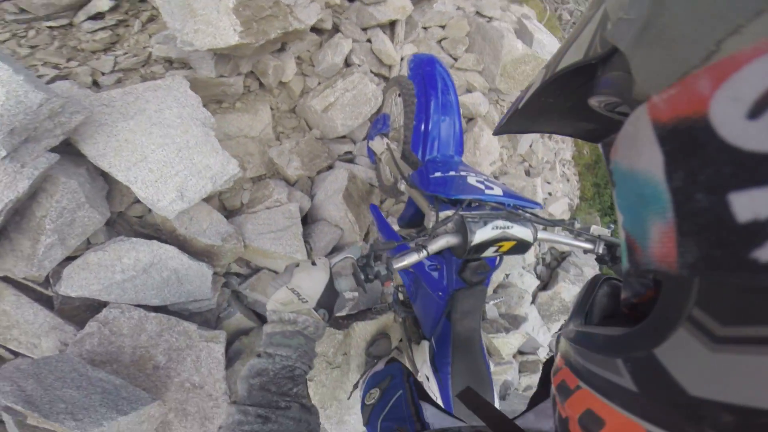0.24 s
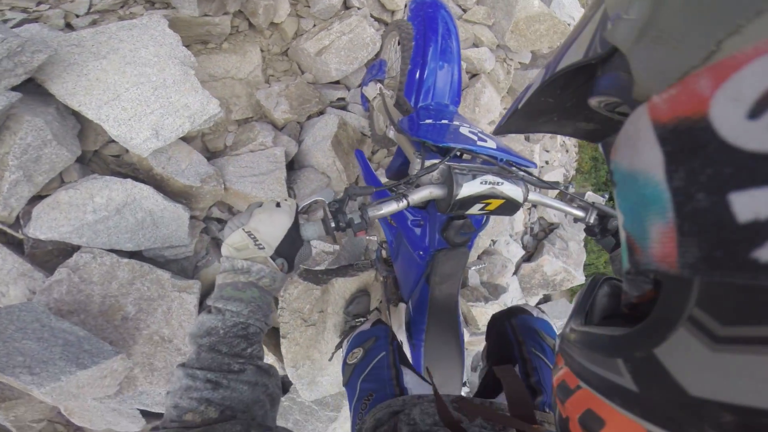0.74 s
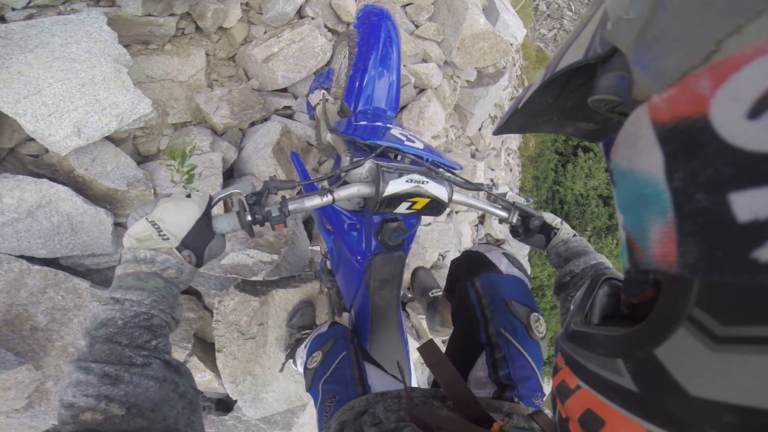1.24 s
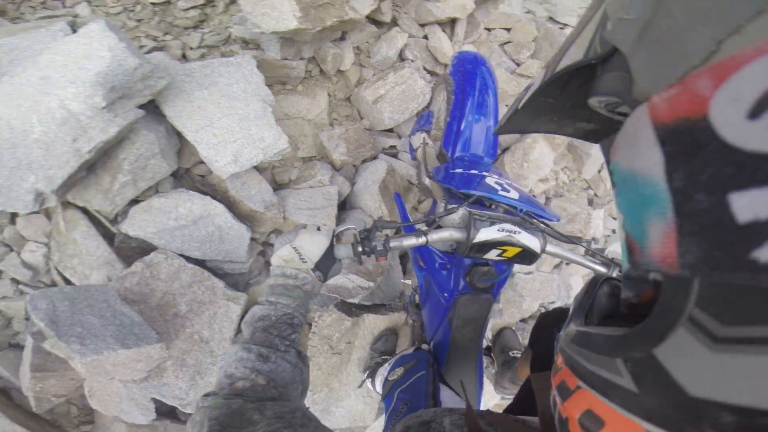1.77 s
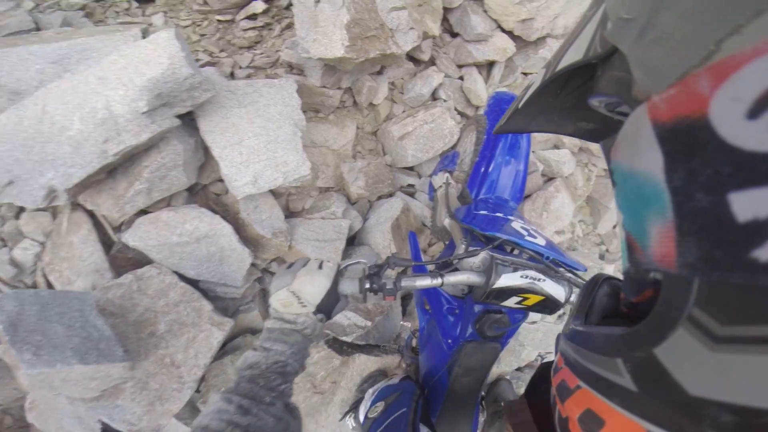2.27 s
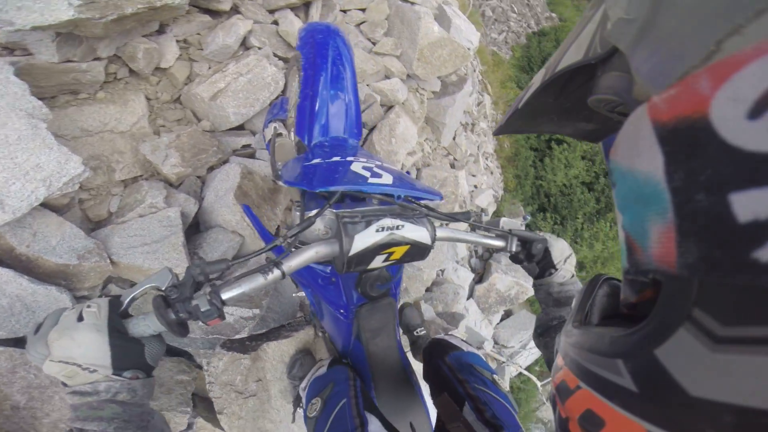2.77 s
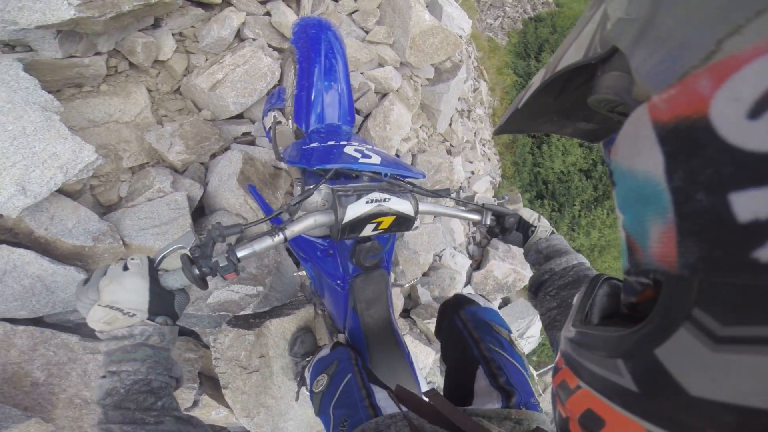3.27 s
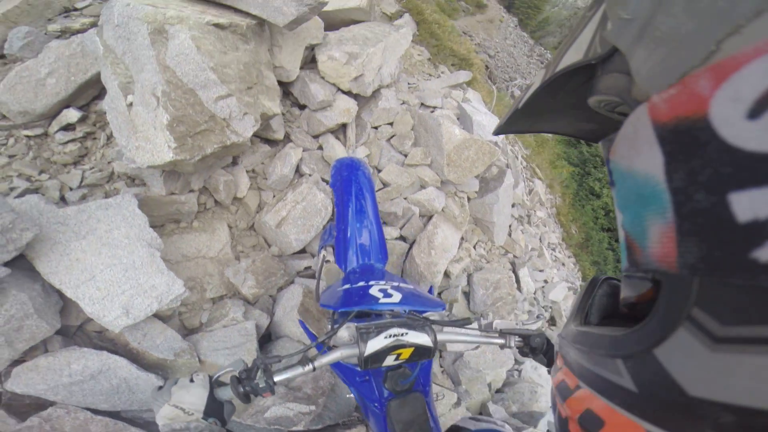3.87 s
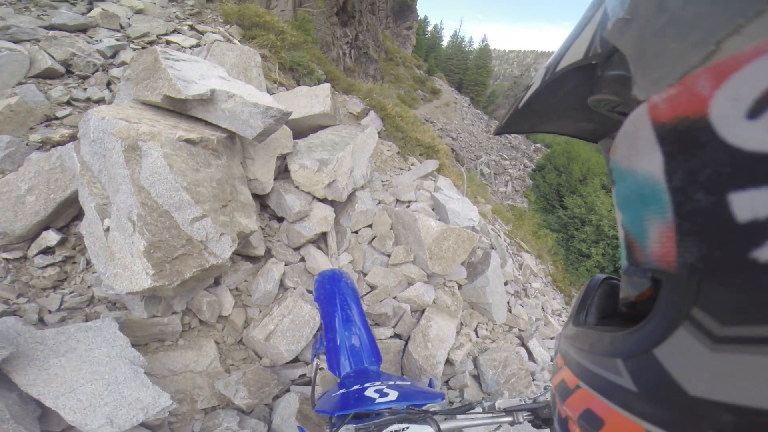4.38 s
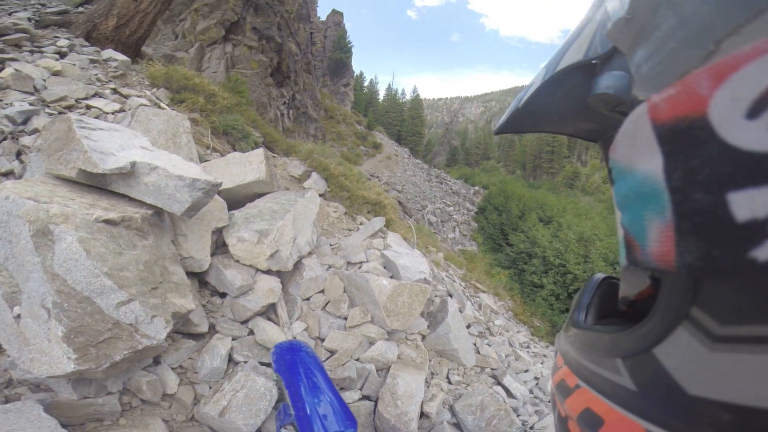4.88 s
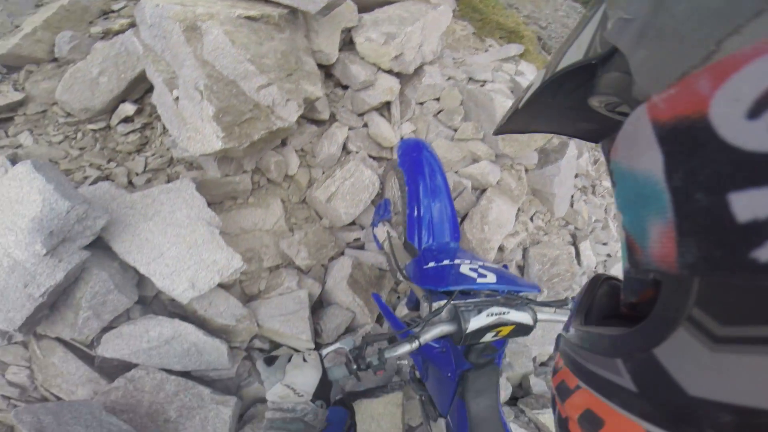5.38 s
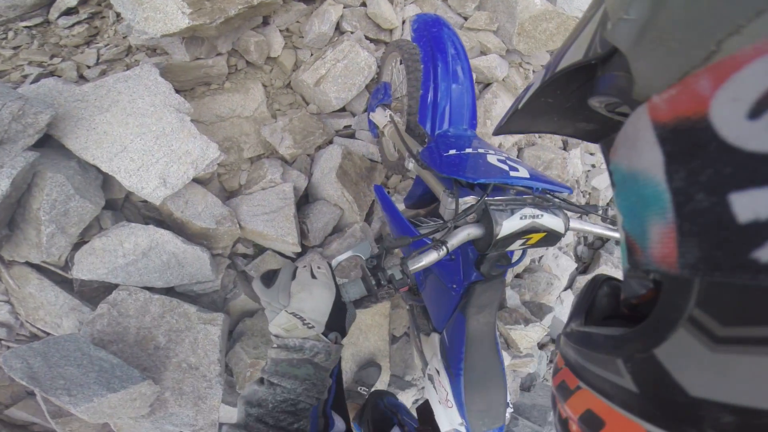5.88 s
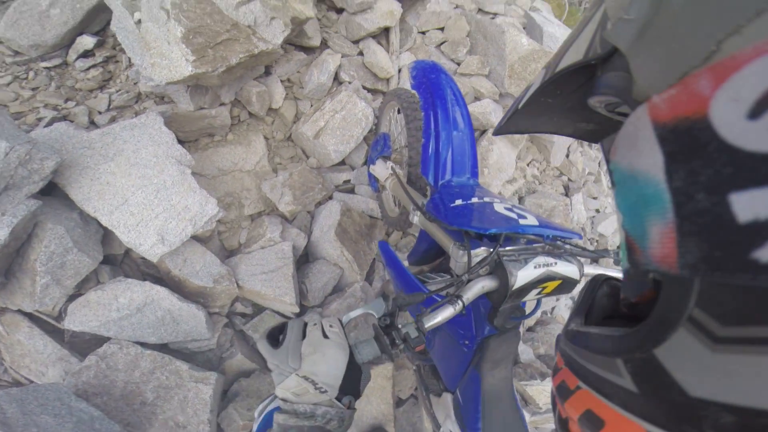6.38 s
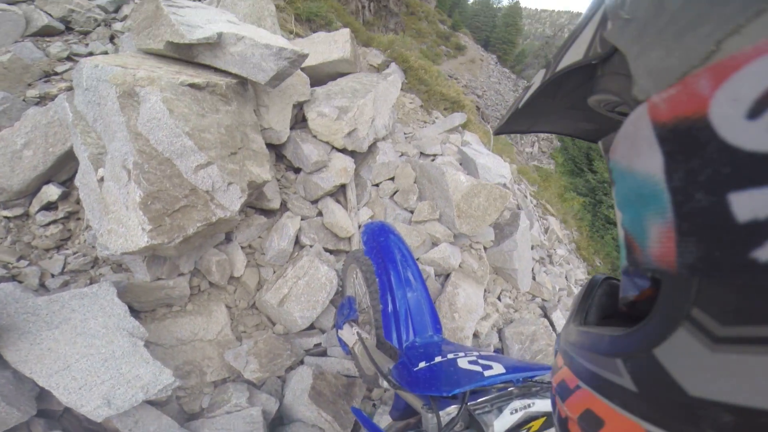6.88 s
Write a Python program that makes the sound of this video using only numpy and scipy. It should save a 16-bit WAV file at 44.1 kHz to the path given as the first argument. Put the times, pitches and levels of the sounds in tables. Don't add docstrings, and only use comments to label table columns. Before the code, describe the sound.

Close, gritty boot scrapes and stone knocks open the scene under low wind buffeting. After a quiet wait, a kick lever swishes and slams, and a two-stroke engine bursts into a loud, rising rev. It coasts down with whirring and rattling, revs again more briefly, falls back and idles with irregular soft pops. The single close microphone sounds boxy and muffled, with a short echo from surrounding boulders.

```python
import sys
import numpy as np
from scipy import signal
from scipy.fft import rfft, irfft
from scipy.io import wavfile
from scipy.ndimage import uniform_filter1d

SR = 44100
rng = np.random.default_rng(int(sys.argv[2]) if len(sys.argv) > 2 else 0)


def unload_wav(signal):
    wavfile.write(
        sys.argv[1],
        SR,
        np.round(np.clip(np.atleast_2d(signal).T, -1, 1) * 32767).astype(np.int16),
    )


def to_linear_factor(level_db):
    exponent = np.asarray(level_db, float) / 20
    return 10 ** exponent


N = 314433
T = np.arange(N) / SR
HZ = np.fft.rfftfreq(8192, 1 / SR) + 1
PUFF = SR // 4
IDLE_FROM_S = 5.15

# time in seconds, turns in Hz, steady burn in dB,
# level gained as the head nears the engine in dB, head raised from 0 to 1.
CRANK = [(2.6, 29.8, -36, 1, 0.1), (2.648, 39.2, -23, 0.5, 0.4), (2.699, 42.1, -24, 3, 0.2),
         (2.751, 62.7, -21, -2.5, 0.4), (2.811, 82.2, -17.5, -7.5, 1), (2.89, 109.4, -18.5, 2.5, 0),
         (2.93, 122.5, -23, 1, 0.37), (3.31, 90.83, -40, -0.5, 0.4), (3.819, 65.88, -35, 0.5, 0.58),
         (3.948, 67.3, -39, 0, 0.7), (4.1, 81.1, -28, -0.5, 0.41), (4.218, 94.04, -40, 0.5, 0.4),
         (4.831, 65.3, -51, -0.5, 0.99), (5.211, 54.7, -53, -0.5, 0.56), (5.7, 46.9, -52, 1, 0.18),
         (6.11, 52, -42, 0, 0.16), (6.45, 53.7, -38.5, 1.5, .6), (7.13, 54.3, -41, 2, 0.75)]


def level(x, db=0):
    return x * to_linear_factor(db) / np.sqrt(np.mean(x ** 2))


def peak(x):
    return x / np.abs(x).max()


def shape(points):
    hz, db = np.transpose(points)
    return to_linear_factor(np.interp(np.log(HZ), np.log(hz), db))


def modes(table, steep=2):
    return np.sqrt(sum(to_linear_factor(db) ** 2 / (1 + (2 * (HZ - hz) / width) ** 2) ** steep for hz, width, db in table))


def through(x, gain):
    cep = irfft(np.log(gain + 1e-7))
    cep[1:4096] *= 2
    cep[4097:] = 0
    return signal.fftconvolve(x, irfft(np.exp(rfft(cep))))[:N]


def clicks(times, sizes):
    place = np.clip(times * SR, 0, N - 2)
    whole = place.astype(int)
    part = place - whole
    return np.bincount(whole, sizes * (1 - part), N) + np.bincount(whole + 1, sizes * part, N)


def burst(rise_s, hold_s, t60_s):
    t = T[:PUFF]
    return np.minimum(t / rise_s, 1) * np.exp(-np.log(1000) * np.maximum(t - hold_s, 0) / t60_s)


def walk(rate):
    k = int(SR / rate)
    steps = np.repeat(rng.standard_normal(N // k + 1), k)
    return 0.69 * uniform_filter1d(uniform_filter1d(steps, k), k)[:N]


def noise():
    return rng.standard_normal(N)


def engine():
    # frequency in Hz, level in dB per Hz.
    gas_colour = [(590, -21.5), (1000, -19), (1260, -52), (1490, -25), (1900, -1), (2490, -1), (2830, -1),
                  (3390, 0.5), (3640, -1), (4520, 4), (12500, -27.5), (15300, -32)]
    # frequency in Hz, width in Hz, level in dB.
    jet_edge = [(7760, 6600, 2), (8700, 480, 6), (10500, 700, 0.5)]
    # frequency in Hz, width in Hz, depth from 0 to 1.
    dips = [(1295, 154, 0.88), (1860, 81, 0.14), (3606, 220, 0.54)]
    hz, burn_db, clatter_db, low_db, hiss_db = controls()
    running = np.clip((T - CRANK[0][0]) / 0.0055 + 1, 0, 1)
    angle = crank_angle(hz)
    gas = (1 + 0.16 * np.cos(2 * np.pi * angle)) * noise()
    hiss = level(through(gas, shape(gas_colour)), -6.5) * to_linear_factor(hiss_db)
    spit = noise() * (.35 + np.exp(-(angle % 1) / .2))
    jet = level(through(spit, modes(jet_edge)), -20.5) * throttle() * to_linear_factor(burn_db) * (hz / 80) ** 2.2
    helmet = np.ones(len(HZ))
    for dip_hz, width, depth in dips:
        helmet = helmet * (1 - np.clip(depth, 0, .9) / (1 + (2 * (HZ - dip_hz) / width) ** 2))
    mechanics = case(hz, angle, clatter_db, low_db) + gears(hz)
    return through(running * (exhaust(hz, angle, burn_db) + mechanics + hiss + jet), helmet)


def controls():
    s, hz, *columns = np.transpose(CRANK)
    hz = np.exp(np.interp(T, s, np.log(hz)))
    burn_db, head_db, raised = (np.interp(T, s, c) for c in columns)

    def law(db_at_80_hz, db_per_doubling, slowest_hz=25):
        return db_at_80_hz + db_per_doubling * np.log2(np.maximum(hz, slowest_hz) / 80)

    def both(free_db, load_db):
        return head_db + 20 * np.log10(np.hypot(to_linear_factor(free_db), throttle() * to_linear_factor(burn_db + load_db)))

    clatter_db = both(law(-33, 7.9, slowest_hz=46), law(-10, 6.7))
    hiss_db = both(law(-32, 18), law(-0.26, 6.9))
    low_db = law(-6, -2, slowest_hz=54.7) + 7 * raised
    return hz, burn_db, clatter_db, low_db, hiss_db


def throttle():
    # start in seconds, end in seconds.
    coasting = [
        (2.922, 3.84),
        (4.215, 5.15),
    ]
    shut_s = .012
    return 1 - sum(np.clip(np.minimum(T - a, b - T) / shut_s, 0, 1) for a, b in coasting)


def firings():
    # time in seconds, thump peak in dB.
    rev_firings = [(2.6, -9.5), (2.635, -16), (2.731, -11), (2.795, -9), (2.807, -22), (2.84, -6),
                   (2.861, -6), (3.866, -14), (3.94, -11), (3.999, -12), (4.04, -12), (4.082, -12),
                   (4.094, -39), (4.107, -14), (4.12, -18), (4.143, -15), (4.154, -16), (4.187, -12),
                   (4.198, -19)]
    # time in seconds, thump peak in dB.
    idle_firings = [(4.889, -22), (4.986, -20), (5.25, -27), (5.344, -27), (5.382, -28), (5.461, -25.5),
                    (5.498, -23), (5.599, -20), (5.7, -23), (5.741, -25), (5.824, -25), (5.864, -24.5),
                    (5.928, -26), (5.947, -22.5), (5.988, -27.5), (6.008, -26.5), (6.028, -24.5),
                    (6.07, -20), (6.145, -19), (6.221, -18), (6.313, -18), (6.384, -22.5), (6.456, -20.5),
                    (6.527, -19.5), (6.597, -18.5), (6.667, -18.5), (6.743, -19), (6.796, -22.5),
                    (6.868, -20), (6.936, -18), (7.006, -19.5), (7.075, -20)]
    s, db = np.transpose(rev_firings)
    idle_s, idle_db = np.transpose(idle_firings)
    crack_db = db + np.where(s < 3.3, -21.5, -15)
    idle_crack_db = -32.5 + 2.3 * (idle_db + 20)
    return np.r_[s, idle_s], np.r_[db, idle_db], np.r_[crack_db, idle_crack_db]


def crank_angle(hz):
    turns = np.cumsum(hz) / SR
    at_fire = np.interp(firings()[0], T, turns)
    whole = np.r_[0, np.cumsum(np.round(np.diff(at_fire)))]
    return turns + np.interp(turns, at_fire, whole - at_fire)


def exhaust(hz, angle, burn_db):
    # frequency in Hz, width in Hz, level in dB.
    pipe = [(244, 75, -5), (388, 51, 5.5), (486, 80, 2.5), (641, 89, 1), (756, 132, 1.5), (1080, 140, -3)]
    # multiple of the turn, level in dB.
    song = [(2, -9), (4, -3.5), (5, -15)]
    # frequency in Hz, width in Hz, level in dB.
    churn = [(260, 75, -1.5), (400, 110, 0), (695, 430, -11.5)]
    turn = np.arange(int(angle[-1]) + 1)
    pump_chance, burn_chance, time_chance = rng.standard_normal((3, len(turn)))
    at = np.interp(turn + .008 * time_chance, angle, T)
    even = 1 / np.sqrt(np.interp(at, T, hz))
    strokes = clicks(at, even * to_linear_factor(1.2 * pump_chance))
    pump = sum(through(strokes, modes([mode])) * to_linear_factor(3.0 * walk(6.07)) for mode in pipe)
    s, thump_db, crack_db = firings()
    since_s = at - np.r_[-1, s][np.searchsorted(s, at - .008)]
    spent_db = -6 * np.exp(-since_s / .03) * (at > IDLE_FROM_S)
    weak = clicks(at, even * to_linear_factor(2.5 * burn_chance + spent_db))
    burns = level(weak, -28.5) * throttle() * to_linear_factor(burn_db) + clicks(s - .002, to_linear_factor(thump_db - 5.5))
    frame = frame_hum(hz, angle)
    airflow = level(pump, -46.5) * (hz / 80) ** 2.38 + frame * to_linear_factor(-45.5) * (hz / 80) ** 0.93
    howl = sum(to_linear_factor(db) * np.sin(2 * np.pi * k * angle) for k, db in song) * (hz / 120) ** 6.2
    growl = level(through(noise(), modes(churn)), -10.5) * (T <= IDLE_FROM_S)
    loaded = (frame * to_linear_factor(-18.5) + howl + growl) * throttle() * to_linear_factor(burn_db)
    return airflow + loaded + thumps(burns) + crack(s, crack_db)


def thumps(burns):
    # frequency in Hz, width in Hz, level in dB.
    front = [(266, 85, 5.5), (384, 340, 4.5), (590, 340, 3), (720, 280, 3.5)]
    idle = T > IDLE_FROM_S
    push_s = 0.00254
    open_end = (HZ / (HZ + 120)) ** 2 / (1 + (HZ / 900) ** 4)
    pushed = signal.fftconvolve(burns, burst(push_s, push_s, 0.00083) / (push_s * SR / 2))[:N]
    hard = to_linear_factor(39.0) * through(pushed * ~idle, modes(front, steep=2.4) * open_end)
    soft = signal.fftconvolve(burns * (1 + idle * (1 - to_linear_factor(-13.0))), blow())[:N]
    return hard + soft


def blow():
    # frequency in Hz, width in Hz, level in dB.
    hot_pipe = [(200, 57, 0.5), (400.7, 51.6, 12), (509.5, 63, 4.5), (676, 203, -3.5)]
    t = T[:PUFF]
    wave = burst(0.00266, 0.0069, 0.018) * np.sin(2 * np.pi * (250 * t + 7000 * t ** 2))
    ring = through(burst(0.00024, 0.0014, 0.0015), modes(hot_pipe, steep=2.16))[:PUFF]
    return peak(through(wave, HZ ** 2 / (HZ ** 2 + 120 ** 2))[:PUFF] + to_linear_factor(-5) * peak(ring))


def crack(s, crack_db):
    # frequency in Hz, level in dB per Hz.
    crack_colour = [(1650, -13.5), (2800, -5.5), (3070, -10), (3640, -9), (4230, -0.5), (5050, -8),
                    (5990, -0.5), (8080, -14.5), (13600, -25.5), (15300, -44)]
    starts = clicks(s - .0065, to_linear_factor(crack_db - 1.0))

    def puffs(hold_s, t60_s):
        return signal.fftconvolve(starts, burst(.0018, hold_s, t60_s))[:N]

    spray = level(through(noise(), shape(crack_colour)) * to_linear_factor(1.9 * walk(370)))
    body = through(spray, 1 / (1 + (HZ / 8500) ** 6))
    top = through(spray, 1 / (1 + (8500 / HZ) ** 6))
    return body * puffs(0.018, 0.11) + top * puffs(0.017, 0.043)


def frame_hum(hz, angle):
    # multiple of the turn, level in dB.
    orders = [(1, 0), (2, -1), (3, -1), (4, 0), (5, -2), (6, -4), (7, -4), (8, -6), (9, -7), (10, -8)]
    # frequency in Hz, gain in dB.
    frame_gain = [(45, -7.5), (125, 1), (195, -11), (270, 2.5), (340, 0.5), (390, 7), (450, -4), (560, -10),
                  (740, 2), (950, -19)]
    passed_hz, passed_db = np.transpose(frame_gain)
    hum = np.zeros(N)
    for k, db in orders:
        waver_db = 2.8 * (walk(7) + walk(24.93))
        heard_db = db + np.interp(k * hz, passed_hz, passed_db) + waver_db
        hum += to_linear_factor(heard_db) * np.sin(2 * np.pi * k * angle)
    return hum


def case(hz, angle, clatter_db, low_db):
    # frequency in Hz, width in Hz,
    # level in dB, gain in dB per doubling of speed.
    covers = [(1100, 18, -12.5, -22), (1399, 63, 1, -0.5), (1490, 76, 7, -0.5), (1670, 150, 2, 4),
              (1788, 40, -1, 9), (2182, 108, 6, -3.5), (2524, 178, 6.5, 0.5), (2763, 74, 0.5, 1),
              (3096, 270, -5.5, 12.5), (4146, 310, -4, 9), (4390, 225, -14.5, -24), (5730, 570, -3.5, 4.5),
              (6660, 230, -6.5, 5), (8500, 450, -30, 8)]
    turns = int(angle[-1]) + 1
    time_chance, size_chance = rng.standard_normal((2, turns, 14))
    angles, weight = rng.random(14), rng.standard_normal(14)
    at = np.interp(np.arange(turns)[:, None] + angles + .003 * time_chance, angle, T)
    size = weight * to_linear_factor(2 * size_chance) / np.sqrt(np.interp(at, T, hz))
    steady = np.clip((hz - 40) / 40, .1, 1)
    slap = level(clicks(at.ravel(), size.ravel()), 2) * steady
    rattle = noise() * np.sqrt(2 - steady ** 2)
    shake = through(slap + rattle, 1 / (1 + (HZ / 8200) ** 5))
    doublings = np.log2(np.maximum(hz, 45) / 75)
    panels = []
    for *mode, per_doubling_db in covers:
        flutter_db = 3.5 * walk(4.09)
        panels.append(through(shake, modes([mode], steep=1.25)) * to_linear_factor(per_doubling_db * doublings + flutter_db))
    return to_linear_factor(clatter_db) * (level(sum(panels[5:])) + level(sum(panels[:5])) * to_linear_factor(low_db))


def gears(hz):
    # frequency in Hz, width in Hz, level in dB.
    cover = [(1460, 360, 2.5)]
    turns = np.cumsum(hz) / SR
    wobble = 4.0 + 2.6 * level(through(noise(), modes([(0, 111, 0)])))
    mesh = wobble * to_linear_factor(2.1 * walk(3.4)) * np.sin(2 * np.pi * 21 * turns)
    heard = through(level(mesh), modes(cover) + .45)
    return heard * to_linear_factor(-43 + 11 * np.log2(hz / 80)) * np.clip((T - 2.8) / .12, 0, 1)


def whistle():
    start_s, end_s = 4.22, 4.95
    fade = np.clip(np.minimum(T - start_s, end_s - T) / 0.055, 0, 1)
    return level(through(noise(), modes([(10300, 30, 0)])), -63) * fade


def kick():
    # frequency in Hz, width in Hz, level in dB.
    stop = [(2600, 160, 0), (4450, 260, -2), (6400, 800, -13), (1500, 300, -14), (8800, 900, -22),
            (11000, 5000, -37)]
    creak = through(clicks(np.array([1.332]), np.ones(1)), modes([(10100, 90, 0), (5050, 90, -2)]))
    ratchet = level(through(noise(), modes([(1930, 2000, 0)])), -50) * np.exp(-((T - 2.482) / 0.026) ** 2)
    swish = level(through(noise(), modes([(7360, 2900, 0), (4500, 1200, 2)])), -53)
    swish = swish * np.exp(-((T - 2.52) / .011) ** 2)
    puff = clicks(np.array([2.527, 2.537]), np.array([1, .7]))
    puff = through(puff, modes([(239, 54, 1.5), (302, 140, 9.1)]))
    slam = clicks(np.array([2.586]), np.ones(1))
    slam = signal.fftconvolve(slam, burst(0.0053, 0.0074, 0.031))[:N] * noise()
    slam = through(slam, modes(stop, steep=1.2))
    return to_linear_factor(-56) * peak(creak) + ratchet + swish + to_linear_factor(-31.0) * peak(puff) + to_linear_factor(-8.5) * peak(slam)


def knocks():
    # time in seconds, peak in dB, main ring in Hz,
    # high ring in dB, thud in dB.
    hits = [(0.07, -45, 1640, -19, -20), (0.109, -44, 1050, -11, -25), (0.143, -21, 1080, 0, -45),
            (0.16, -19, 1080, -10, -32), (0.172, -27, 1180, -25, -33), (0.187, -27.5, 1680, -23.5, -17),
            (0.22, -34, 1700, 4, -29), (0.262, -42, 1080, -3, -26), (0.316, -45, 1200, -10, -25),
            (0.35, -39, 1100, -14, -25), (0.377, -36, 1760, -16, -24), (0.396, -44, 1700, -8, -27),
            (0.418, -34.5, 1130, -26, -16), (0.486, -38, 1460, -21, -26), (0.521, -28.5, 1740, -31, -22),
            (0.55, -28.5, 1930, -20, -25), (0.563, -40, 2100, -12, -30), (0.575, -25, 1860, -31, -31),
            (0.595, -50, 2000, -20, -30), (0.837, -43, 1220, -1, -17), (0.885, -46, 1100, -8, -13),
            (0.921, -43, 1010, -7, -24), (0.94, -42, 1500, -8, -23), (0.96, -38, 1690, -5, -31),
            (1.402, -44, 2580, -9, -34)]
    out = np.zeros(N)
    thud = burst(0.0028, 0.011, 0.11) * np.sin(2 * np.pi * 225 * T[:PUFF])
    for s, db, hz, high_db, thud_db in hits:
        t60_s = max(0.03 - 0.0008 * (db + 48.0), .005)
        rise_s = .0004 if db > -37 else .0015
        contact = burst(rise_s, 0.002, t60_s) * rng.standard_normal(PUFF)
        ring = through(contact, modes([(hz, 0.34 * hz, 0), (2500, 500, -7), (4650, 350, high_db)]))[:PUFF]
        out[int(s * SR):][:PUFF] += to_linear_factor(db) * (peak(ring) + to_linear_factor(thud_db + 6.0) * thud)
    return out


def scrape():
    # peak in seconds, level in dB, swell in seconds, fade in seconds
    # (both for about 30 dB), squeak above the level in dB.
    boot_drags = [(0.0, -32.5, .1, 0.11, -14), (0.16, -29.5, 0.1, 0.26, -14), (0.39, -41, 0.12, 0.078, -15),
                  (0.435, -43, 0.047, 0.038, -14), (0.524, -38, 0.0072, .017, -33),
                  (0.551, -37.5, 0.0074, 0.099, -24), (0.954, -39.5, 0.18, 0.066, -7),
                  (1.408, -42, .03, .06, -25)]
    # frequency in Hz, level in dB per Hz.
    grit_colour = [(240, -32), (400, -4), (514, -8), (970, 0.5), (1740, 0.5), (2500, -3.5), (3580, -28),
                   (4660, -12.5), (7000, -23), (9100, -58), (15400, -120)]
    grains = noise() * to_linear_factor(6.6 * walk(149.6))
    grit_gain, squeak_gain = np.zeros(N), np.zeros(N)
    for s, db, swell_s, fade_s, squeak_db in boot_drags:
        drag = to_linear_factor(db - 31.6 * np.maximum((s - T) / swell_s, (T - s) / fade_s))
        grit_gain += drag
        squeak_gain += drag * to_linear_factor(squeak_db)
    squeak = level(through(grains, modes([(4620, 110, 0)]))) * squeak_gain
    return to_linear_factor(-8.5) * (level(through(grains, shape(grit_colour))) * grit_gain + squeak)


def gusts():
    # peak in seconds, buffet in dB, length in seconds.
    gust_rows = [(0.014, -24, 0.18), (0.29, -35, 0.11), (0.427, -34, 0.085), (0.62, -41, 0.16),
                 (0.824, -42, 0.089), (1.096, -42, 0.051), (1.52, -40, .09), (1.742, -42, 0.083),
                 (1.937, -40.5, 0.11), (2.045, -45, 0.063), (2.2, -57, .12), (2.447, -34, 0.099),
                 (2.617, -29.5, 0.13), (2.782, -38, 0.15), (2.959, -40, 0.037), (3.176, -40, 0.05),
                 (3.544, -34, 0.067), (3.714, -43, 0.12), (3.93, -40, 0.15), (4.1, -30, 0.078),
                 (4.218, -37, 0.2334), (4.522, -27.5, 0.11), (5.044, -37.5, 0.15), (5.179, -34, 0.043),
                 (5.41, -32.5, 0.13), (5.708, -34, 0.4), (6.032, -30, 0.043), (6.449, -39, 0.46),
                 (6.682, -36, 0.054), (6.836, -35, 0.048)]
    power = sum(to_linear_factor(db) ** 2 * np.exp(-(2 * (T - s) / length_s) ** 2) for s, db, length_s in gust_rows)
    power = power + to_linear_factor(-36) ** 2 * np.clip((T - 6.97) / 0.032, 0, 1)
    return 10 * np.log10(power + to_linear_factor(-45.5) ** 2)


def wind():
    # frequency in Hz, level in dB per Hz.
    rustle_colour = [(40, -22), (70, 2), (140, 2.5), (230, 0), (400, -18.5), (900, -33)]
    buffet_db = gusts()
    rustle_db = -57 + .3 * (buffet_db + 41.0) + 2.5 * walk(27)
    swing = signal.hilbert(through(noise(), modes([(35.9, 8.8, 8.8), (23.3, 36, 0.5)])))
    buffet = level(swing.real / np.abs(swing) ** 0.5) * to_linear_factor(buffet_db)
    port = signal.butter(4, 56, fs=SR, output="sos")
    rustle = level(through(noise(), shape(rustle_colour)) * to_linear_factor(0.99 * walk(3.2)))
    return signal.sosfiltfilt(port, buffet) + rustle * to_linear_factor(rustle_db)


def hillside():
    # frequency in Hz, level in dB per Hz.
    air_colour = [(180, -13), (300, 1), (1300, -5), (1530, -5), (2470, -9.5), (5010, -19), (5800, -14.5),
                  (7310, -21.5), (10700, -31.5), (11600, -21), (12400, -39), (14600, -42), (15300, -42)]
    # frequency in Hz, rms level in dB.
    whines = [(5846, -76), (11660, -89), (11687, -96), (11719, -76), (14650, -94)]
    housing = modes([(1560, 88, 1.9), (2420, 740, 1), (4460, 490, 3.7), (5690, 310, 2.4)]) + 1
    air = level(through(noise(), shape(air_colour) * housing), -55.5)
    return air + sum(to_linear_factor(db) * np.sqrt(2) * np.sin(2 * np.pi * hz * T) for hz, db in whines)


def scene():
    near = engine() + kick() + knocks() + scrape() + whistle()
    rocks = burst(0.0015, 0.002, 0.08) * rng.standard_normal(PUFF)
    echo = signal.fftconvolve(near, rocks / np.sqrt(np.sum(rocks ** 2)))[:N]
    return np.tile(near + to_linear_factor(-13) * echo + wind() + hillside(), (2, 1))


def band_limit(x):
    return signal.sosfilt(signal.butter(12, 15400, fs=SR, output="sos"), x)


def record(dry):
    ceiling = .66
    top_cut = signal.ellip(8, .2, 70, 15080, fs=SR, output="sos")
    mix = signal.sosfilt(top_cut, ceiling * np.tanh(dry / ceiling))
    return band_limit(mix)


dry = scene()
out = record(dry)
unload_wav(out)
```